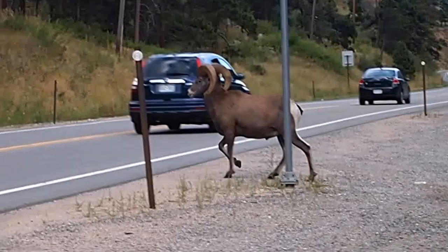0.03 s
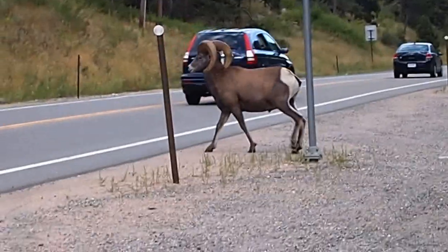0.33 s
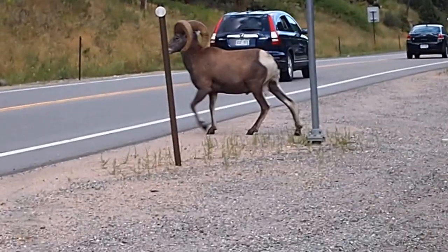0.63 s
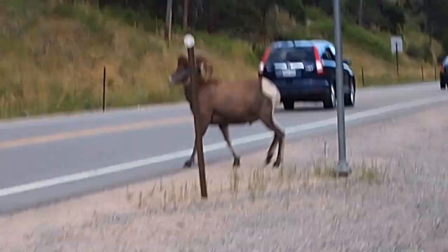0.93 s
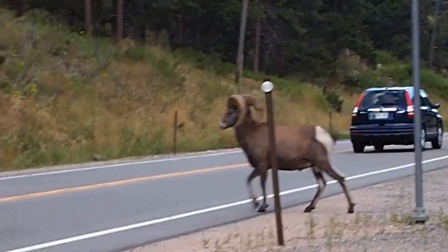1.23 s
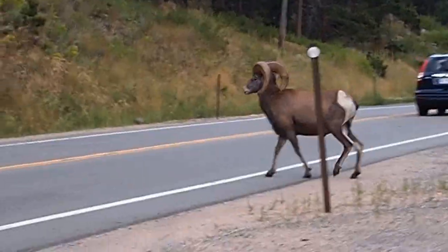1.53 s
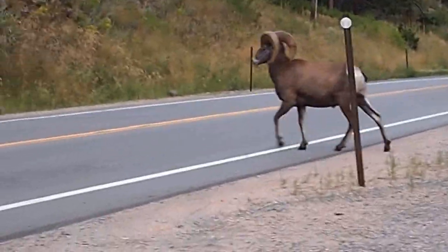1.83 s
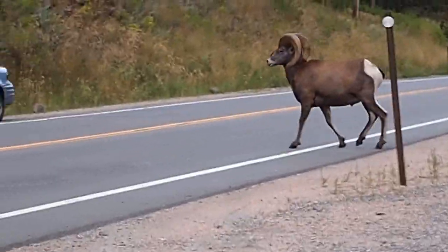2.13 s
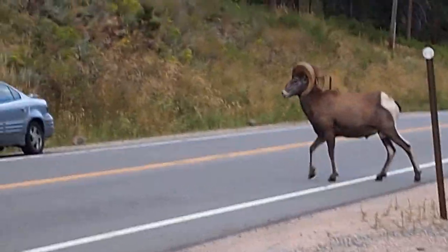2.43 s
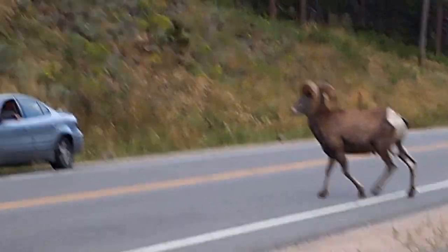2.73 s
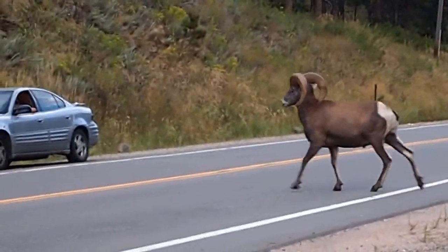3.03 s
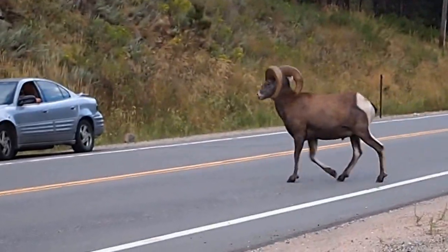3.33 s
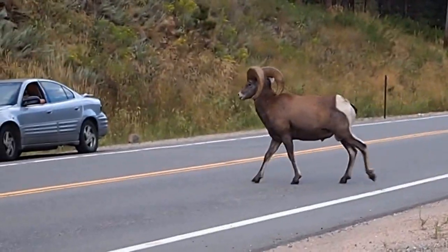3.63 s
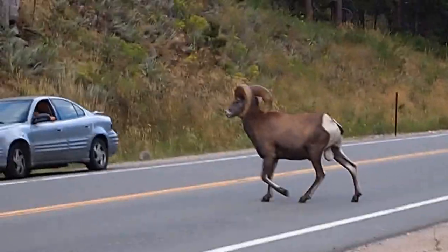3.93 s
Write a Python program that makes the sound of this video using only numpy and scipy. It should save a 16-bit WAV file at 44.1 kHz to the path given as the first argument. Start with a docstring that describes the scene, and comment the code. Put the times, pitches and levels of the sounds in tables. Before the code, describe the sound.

An engine idles throughout over low traffic rumble and tyre noise, heard from the roadside. A car's exhaust note sinks between 1 and 2 seconds, its brake squealing thinly, strongest just after 1 second. Three low thumps fall between 1 and 2 seconds. Dull knocks and scuffs sound close by near 1, 2.5 and 3.8 seconds. Small metal pieces scrape, jingle and squeak from about 2.4 to 3.2 seconds.

```python
"""An engine idles close by, over the hum, exhaust rumble and tyre noise of traffic crawling along a
mountain road, heard from the verge. A car slows: its exhaust note sinks and a brake disc squeals
thinly. Low thumps, soft scuffs and dull, heavily damped knocks sound near the microphone. Small metal
pieces scrape in a short jingle: tiny slips ring their modes, and they squeak as they drag."""
import sys
import numpy as np
from scipy import signal
from scipy.io import wavfile

SR = 44100
rng = np.random.default_rng(int(sys.argv[2]) if len(sys.argv) > 2 else 0)


def to_wav(sig):
    """Store sig (one row per channel, or 1-D mono) as 16-bit WAV at the path in sys.argv[1].

    Samples outside -1..1 are clipped; the rate is SR.
    """
    pcm = np.clip(np.atleast_2d(sig), -1, 1) * 32767
    pcm = np.round(pcm).astype(np.int16)
    wavfile.write(sys.argv[1], SR, pcm.T)  # frames by channels


N = 176400
T = np.arange(N) / SR

# idling engine: t/s, firing rate/Hz, level/dB
IDLE_FIRING = [(0.25, 50.9, -31), (0.48, 50.9, -28), (0.61, 50.38, -32), (1.54, 50.4, -29.5),
               (1.83, 49.04, -30), (2.48, 48.77, -33), (2.59, 49.28, -29.5), (3.0, 49.12, -32),
               (3.76, 48.85, -32), (4.0, 46.63, -41)]
# its overtones: multiple of the firing rate, level/dB
IDLE_OVERTONES = [(2, -37.5), (3, -40)]
# other queueing engines: f/Hz, level/dB
QUEUE_HUMS = [(67.5, -40.5), (119.5, -36), (186, -43.5)]
# exhaust of the slowing car: t/s, f/Hz, level/dB
EXHAUST_NOTE = [(.2, 162.5, -37), (.87, 162, -35), (1.1, 149, -38), (1.5, 124, -40), (1.9, 118, -46)]
# brake squeal: t/s, level/dB
BRAKE_LEVEL = [(.2, -38), (.236, -37), (.284, -67), (.55, -78), (.675, -48), (.715, -59), (.745, -46),
               (.92, -82), (1.0, -60), (1.07, -31), (1.11, -27), (1.27, -33), (1.32, -38), (1.355, -35.5),
               (1.4, -42.5), (1.51, -52), (1.6, -78)]
# its pitch: t/s, f/Hz
BRAKE_PITCH = [(.24, 9848), (.7, 9815), (1.02, 9850), (1.22, 9828)]
# traffic rumble: f/Hz, relative density/dB
RUMBLE_SPECTRUM = [(20, -4), (33, -9), (48, -7.5), (68, 8.5), (90, -1), (125, 2.5), (180, -3), (230, -7.5),
                   (400, -21)]
# its envelope: t/s, level/dB
RUMBLE_ENVELOPE = [(.2, -36), (.9, -29.5), (1.6, -30), (1.9, -26.5), (2.15, -31), (2.7, -28), (3.1, -29),
                   (4, -29)]
# tyre noise: f/Hz, relative density/dB
TYRE_SPECTRUM = [(150, -3.5), (220, 3.5), (320, 0), (470, 2), (630, -4.5), (830, -5), (1020, -2.5),
                 (1220, -4.5), (1450, -7), (1700, -7.5), (2300, -11), (2900, -14.5), (3350, -14.5),
                 (4000, -20), (4800, -26), (5900, -19.5), (7000, -20), (9100, -53)]
# its envelope: t/s, level/dB, low-mid shelf/dB
TYRE_ENVELOPE = [(.2, -30, 0), (.4, -27, 0.5), (1.05, -26.5, -1.5), (1.55, -28.5, -2.5), (1.85, -27.5, -2),
                 (2.25, -28, -4.5), (2.55, -26.5, -4), (2.95, -27, -12.5), (3.15, -27.5, -4.5),
                 (3.55, -27.5, -9), (3.85, -26.5, -5), (4, -28, -7)]
# swells of tyre hiss: t/s, length/s, level/dB
TYRE_SWELLS = [(0.603, 0.79, -46.5), (1.7, 0.71, -44)]
# low thumps: t/s, level/dB
THUMP_HITS = [(.96, -13), (1.441, -13), (1.821, -14)]
# soft scuffs: t/s, length/s, level/dB, centre f/Hz
SCUFF_RUBS = [(0.967, 0.1, -29.5, 1160), (1.716, 0.13, -32.5, 790), (2.43, 0.065, -34, 1190),
              (2.48, 0.33, -33.5, 1060), (3.809, 0.054, -26.5, 898), (3.907, 0.14, -30, 1330)]
# dull knocks: t/s, level/dB, pitch f/Hz
KNOCK_HITS = [(0.98, -14, 840), (.995, -11.5, 1020), (1.009, -14.5, 900), (1.018, -18, 990),
              (2.436, -17, 1630), (2.453, -14, 940), (2.458, -12.5, 603), (2.497, -9, 1020),
              (3.131, -11.5, 843), (3.236, -17, 1016), (3.76, -13.5, 1670), (3.800, -13, 810),
              (3.81, -9.5, 856), (3.828, -12, 850), (3.894, -7.5, 1120), (3.95, -14.5, 1308)]
# their modes: multiple of the pitch, level/dB, t60/s
KNOCK_RINGS = [(.66, -14, 0.0074), (1.0, -0.5, 0.011), (1.35, -10.5, 0.015), (1.75, -6.5, 0.011)]
# metal scrapes: t/s, length/s, level/dB, centre f/Hz, sparkle level/dB
METAL_SCRAPES = [(0.983, 0.012, -40, 7250, -60), (1.489, 0.022, -47, 7450, -66),
                 (1.615, .025, -50, 7400, -70), (2.158, 0.021, -47, 6940, -62),
                 (2.385, 0.057, -49, 7000, -66), (2.412, 0.034, -48.5, 8350, -68),
                 (2.45, 0.079, -45.5, 6440, -62), (2.572, 0.051, -43, 7180, -57),
                 (2.625, 0.032, -41, 3300, -66), (2.647, 0.058, -44, 7160, -59),
                 (2.688, 0.027, -38, 6100, -52), (2.717, 0.027, -36.5, 6700, -54),
                 (2.720, 0.016, -38.5, 8600, -62), (2.779, 0.044, -36.5, 6820, -66),
                 (2.821, 0.024, -32, 5705, -47), (2.865, .025, -45, 9100, -53),
                 (2.894, 0.021, -37.5, 5860, -53), (2.945, 0.048, -41.5, 6300, -57),
                 (3.009, 0.021, -41.5, 6760, -53), (3.036, 0.04, -48, 7800, -62),
                 (3.214, .03, -46, 6700, -68), (3.36, .015, -49, 7400, -70), (3.938, .02, -51, 7430, -70)]
METAL_RUSTLE = (2.53, 0.95, -54.5, 7000, -68)   # rubbing between scrapes; same columns
# modes of the pieces: f/Hz, relative level/dB, t60/s
METAL_MODES = [(3340, 3, 0.035), (5140, -12, .02), (5450, -6, 0.022), (6045, 7.5, 0.027), (6650, -8, 0.02),
               (7350, 8.5, 0.019), (8700, -5, 0.025), (9340, -2, .025), (10400, -5, 0.035),
               (11000, 2.5, 0.025)]
# squeaks of dragged metal: t/s, length/s, level/dB, starting f/Hz
METAL_SQUEAKS = [(2.595, 0.26, -40, 3436), (2.867, 0.07, -30.5, 6080), (2.868, 0.1, -50, 10300),
                 (2.904, 0.056, -32.5, 5920), (2.907, 0.039, -34, 7410)]


def from_db(db):
    """Decibels to gain."""
    return 10 ** (np.asarray(db) / 20)


def rms_one(x):
    """Scale to rms 1."""
    return x / np.sqrt(np.mean(x ** 2) + 1e-20)


def in_time(rows):
    """One curve per column after t/s."""
    t_s, *columns = np.transpose(rows)
    return [np.interp(T, t_s, column) for column in columns]


def cut(x, hz, kind, order=2):
    """Butterworth filter."""
    return signal.sosfilt(signal.butter(order, hz, kind, fs=SR, output="sos"), x)


def resonance(x, hz, q):
    """Resonator, peak gain 1."""
    return signal.lfilter(*signal.iirpeak(hz, q, fs=SR), x + 1e-18)


def drift(rate_hz):
    """Smooth random movement, rms 1."""
    hop, settle = 40, 2000
    pole = np.exp(-2 * np.pi * rate_hz * hop / SR)
    white = rng.standard_normal(N // hop + settle + 2)
    slow = signal.lfilter([1], [1, -2 * pole, pole * pole], white)[settle:]
    return np.interp(np.arange(N) / hop, np.arange(len(slow)), rms_one(slow))


def turning(hz):
    """Phase of a moving frequency, random start."""
    return 2 * np.pi * (np.cumsum(hz) / SR + rng.random())


def ring(drive, hz, t60_s):
    """Damped mode: a unit click rings a sine of height 1."""
    r, w = from_db(-60 / (t60_s * SR)), 2 * np.pi * hz / SR
    return signal.lfilter([0, np.sin(w)], [1, -2 * r * np.cos(w), r * r], drive + 1e-18)


def clicks_at(t_s, gain):
    """One-sample clicks."""
    return np.bincount((np.ravel(t_s) * SR).astype(int), np.ravel(gain), N)[:N]


def swell(t_s, length_s, skew=0.52):
    """Quick rise, slower fall."""
    return np.sin(np.pi * np.clip((T - t_s) / length_s, 0, 1) ** skew) ** 2


def banded_noise(spectrum, flicker_db, flicker_hz):
    """Third-octave noise bands, each flickering alone; rms 1."""
    hz, db = np.transpose(spectrum)
    edges_hz = 16 * 2 ** (np.arange(30) / 3)
    white, out = rng.standard_normal((2, N)), 0
    for k, (low, high) in enumerate(zip(edges_hz, edges_hz[1:])):
        offset_db = flicker_db * drift(flicker_hz)
        if high > hz[0] and low < hz[-1]:
            band_db = np.interp(np.log(low * high) / 2, np.log(hz), db)
            out += from_db(band_db + offset_db) * cut(white[k % 2], [low, high], "band")
    return rms_one(out)


def idling_engine(firing_gain_db=1, waver_db=1, jitter=0.0045):
    """Slightly uneven firing: one note and its wavering overtones."""
    hz, db = in_time(IDLE_FIRING)
    phase = turning(hz * (1 + jitter * drift(3.7)))
    note = from_db(db + firing_gain_db) * np.sin(phase)
    for k, overtone_db in IDLE_OVERTONES:
        gain = from_db(overtone_db + waver_db * drift(1.05))
        note += gain * np.sin(k * phase + 2 * np.pi * rng.random())
    return np.sqrt(2) * note


def queueing_engines(waver_db=2, jitter=0.0114):
    """Further engines hum, each on its own unsteady note."""
    hum = 0
    for hz, db in QUEUE_HUMS:
        gain = from_db(db + waver_db * drift(2.1))
        hum += gain * np.sin(turning(hz * (1 + jitter * drift(2.77))))
    return np.sqrt(2) * hum


def slowing_car(end_s=2.2, fade_s=0.2):
    """The exhaust note sinks as the engine slows."""
    hz, db = in_time(EXHAUST_NOTE)
    fade = np.clip((end_s - T) / fade_s, 0, 1)
    return np.sqrt(2) * from_db(db + drift(5.8)) * np.sin(turning(hz)) * fade


def brake_squeal(flutter_hz=19.5, flutter_db=1.3, wander_hz=4):
    """A thin disc tone with a rapid flutter."""
    db, = in_time(BRAKE_LEVEL)
    hz, = in_time(BRAKE_PITCH)
    flutter = np.sin(turning(flutter_hz * (1 + 0.14 * drift(4.7))))
    tone = np.sin(turning(hz + wander_hz * drift(14)))
    return np.sqrt(2) * from_db(db + flutter_db * flutter) * tone


def traffic_rumble(throb_hz=30.85, throb_depth=0.27):
    """Low, throbbing exhaust noise."""
    db, = in_time(RUMBLE_ENVELOPE)
    throb = 1 + throb_depth * np.sin(turning(throb_hz * (1 + 0.022 * drift(1.74))))
    return from_db(db) * throb * banded_noise(RUMBLE_SPECTRUM, flicker_db=-0.5, flicker_hz=26)


def tyre_noise(top_hz=6290, shelf_hz=620, peak_mix_db=-5):
    """Tyres rush on the road, with shifting low mids and one narrow peak."""
    db, shelf_db = in_time(TYRE_ENVELOPE)
    rush = banded_noise(TYRE_SPECTRUM, flicker_db=0.75, flicker_hz=8.3)
    rush = cut(rush, top_hz, "low", order=6)
    rush += (from_db(shelf_db) - 1) * cut(rush, shelf_hz, "low", order=1)
    rush += from_db(peak_mix_db) * resonance(rush, hz=812, q=6.9)
    return from_db(db) * rush


def tyre_hiss(centre_hz=3370):
    """Narrow-band hiss swells as tyres roll past."""
    noise = cut(rng.standard_normal(N), centre_hz, "low", order=4)
    hiss = rms_one(resonance(noise, centre_hz, q=6.9))
    return hiss * sum(from_db(db) * swell(t_s, length_s) for t_s, length_s, db in TYRE_SWELLS)


def thumps():
    """Low bumps that die within a few cycles."""
    t_s, db = np.transpose(THUMP_HITS)
    return ring(clicks_at(t_s, from_db(db)), hz=80.6, t60_s=0.063)


def scuffs(band_hz=(430, 1850)):
    """Short, dull rubbing noises."""
    rub = cut(rng.standard_normal(N), band_hz, "band")
    return sum(from_db(db) * swell(t_s, length_s) * rms_one(resonance(rub, hz, q=2))
               for t_s, length_s, db, hz in SCUFF_RUBS)


def knocks(band_hz=(430, 1850)):
    """Each knock rings a few heavily damped modes of alternating sign."""
    rings = 0
    for t_s, db, hz in KNOCK_HITS:
        for k, (ratio, mode_db, t60_s) in enumerate(KNOCK_RINGS):
            rings += (-1) ** k * ring(clicks_at(t_s, from_db(db + mode_db)), hz * ratio, t60_s)
    return cut(rings, band_hz, "band", order=3)


def metal_ring(drive, spread_db=7.5, detune=0.025):
    """Modes of one piece, each a little off pitch; rms 1."""
    rings = 0
    for hz, db, t60_s in METAL_MODES:
        gain = from_db(db + spread_db * rng.standard_normal())
        rings += gain * ring(drive, hz * (1 + detune * rng.uniform(-1, 1)), t60_s)
    return rms_one(rings)


def jingle(slips_per_s=7000, slip_spread_db=3, ring_db=-1.5, grit_db=-4.5, sparkle_hz=13450):
    """Scraping metal: swells of uneven slips give grit, ringing and high sparkle."""
    size = 32000   # samples per scrape, tail included
    out = np.zeros(N + size)
    for t_s, length_s, db, hz, sparkle_db in METAL_SCRAPES + [METAL_RUSTLE]:
        span = slice(int(t_s * SR), int(t_s * SR) + size)
        envelope = np.pad(swell(t_s, length_s), (0, size))[span]
        strengths = rng.choice([-1, 1], size) * from_db(slip_spread_db * rng.standard_normal(size))
        slips = (rng.random(size) < slips_per_s / SR) * strengths * envelope
        grit = resonance(slips, hz, q=4.5)
        body = from_db(ring_db) * metal_ring(grit) + from_db(grit_db) * rms_one(grit)
        sparkle = rms_one(resonance(resonance(slips, sparkle_hz, q=7), sparkle_hz, q=7))
        length_gain = np.sqrt(length_s * SR / size)   # refers the rms to the scrape's length
        out[span] += length_gain * (from_db(db) * body + from_db(sparkle_db) * sparkle)
    return cut(out[:N], hz=13900, kind="low", order=5)


def squeaks(rough_db=3.5, rough_hz=180, jitter_hz=69, sag_hz_per_s=1900):
    """Dragged metal sticks and slips: brief, rough tones that sag in pitch."""
    out = 0
    for t_s, length_s, db, hz in METAL_SQUEAKS:
        envelope = from_db(db + rough_db * drift(rough_hz)) * swell(t_s, length_s)
        sag_hz = sag_hz_per_s * np.clip(T - t_s, 0, length_s)
        out += envelope * np.sin(turning(hz + jitter_hz * drift(160) - sag_hz))
    return out


def scene():
    """All sources at one microphone."""
    vehicles = idling_engine() + queueing_engines() + slowing_car() + brake_squeal()
    road = traffic_rumble() + tyre_noise() + tyre_hiss()
    nearby = thumps() + scuffs() + knocks() + jingle() + squeaks()
    return (vehicles + road + nearby)[None]


def record(dry, hiss_db=-51.5, notch_hz=7950, notch_q=86, start_s=0.198, cutoff_hz=15800):
    """Faint hiss, the microphone's narrow treble dip, an abrupt start, a steep low-pass."""
    x = dry + from_db(hiss_db) * rng.standard_normal(N)
    x = signal.lfilter(*signal.iirnotch(notch_hz, notch_q, fs=SR), x)
    x *= T >= start_s
    return signal.sosfilt(signal.ellip(12, .1, 90, cutoff_hz, fs=SR, output="sos"), x)


dry = scene()
out = record(dry)
to_wav(out)
```